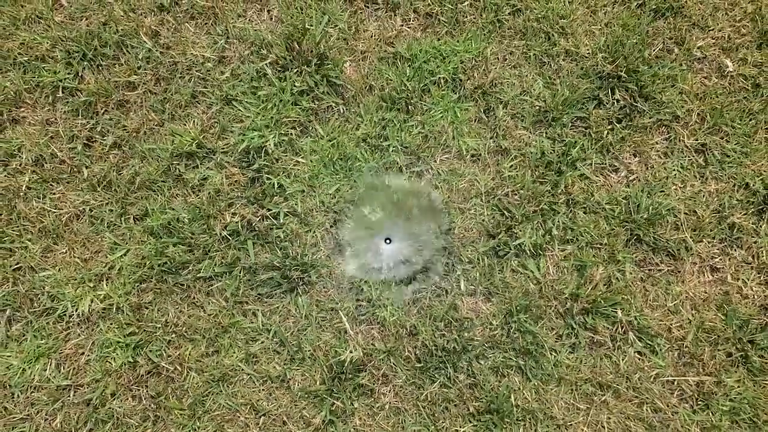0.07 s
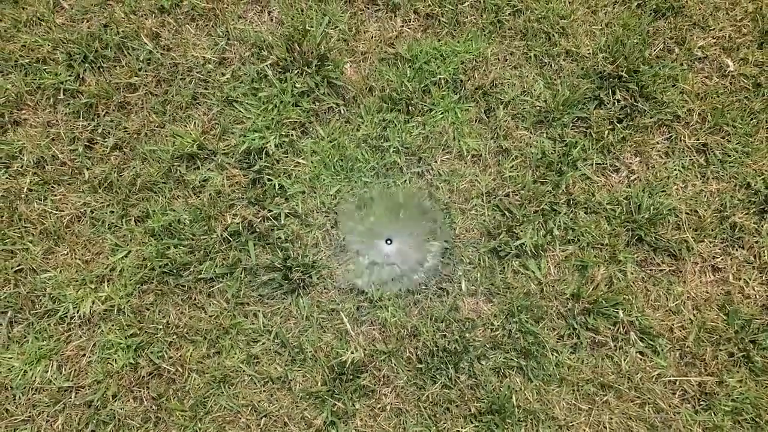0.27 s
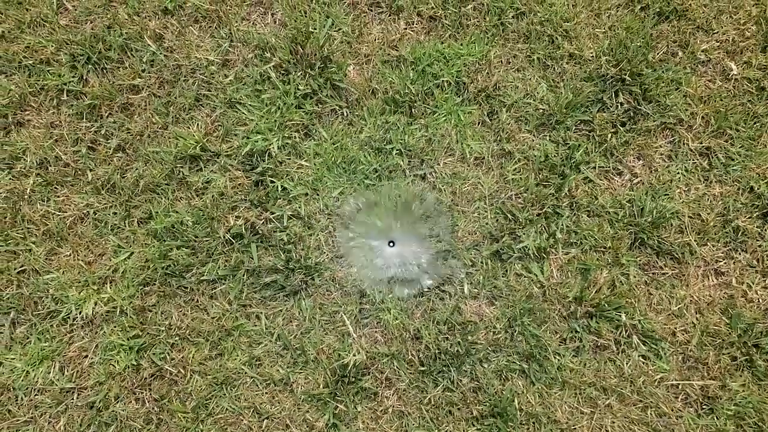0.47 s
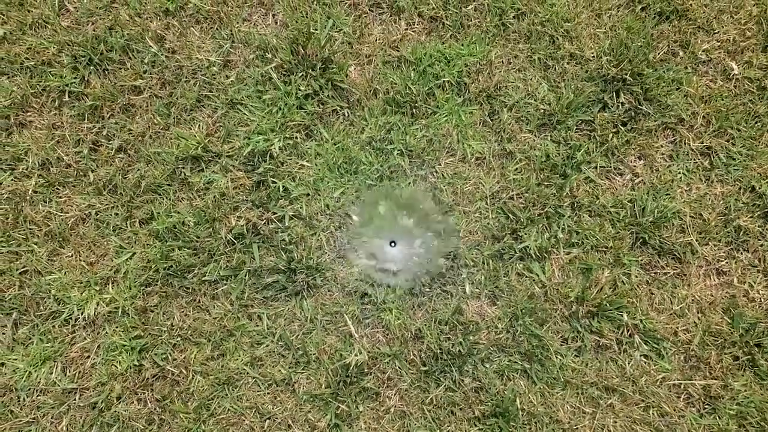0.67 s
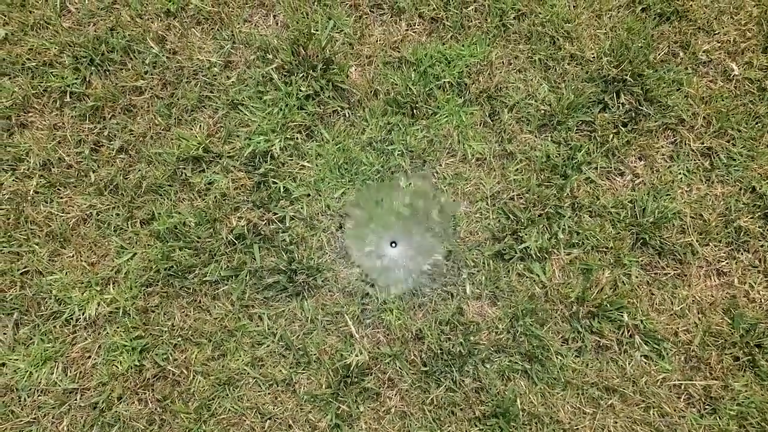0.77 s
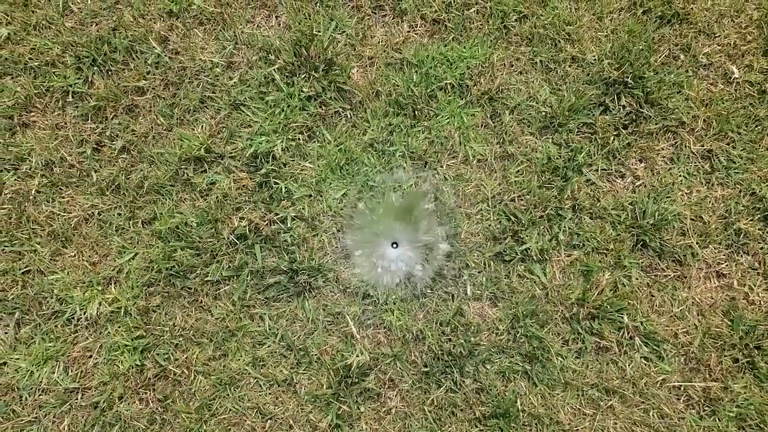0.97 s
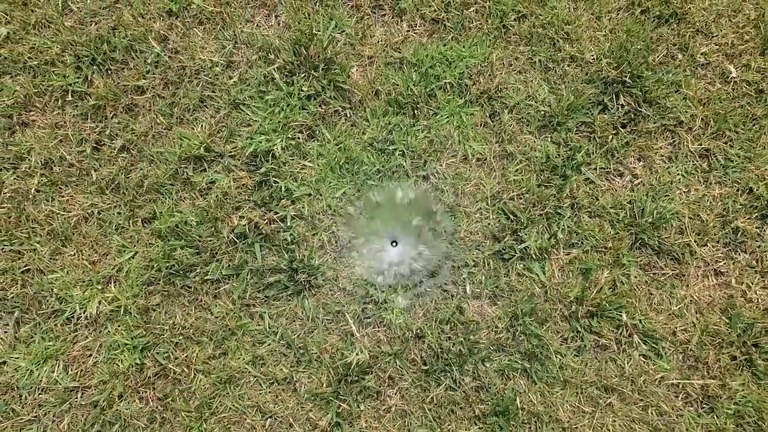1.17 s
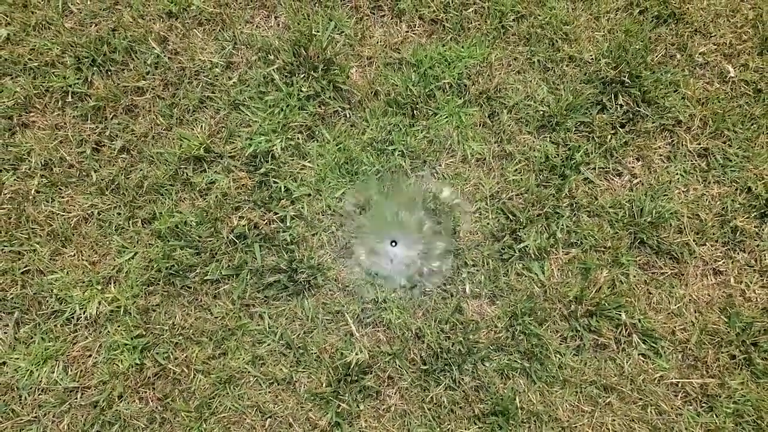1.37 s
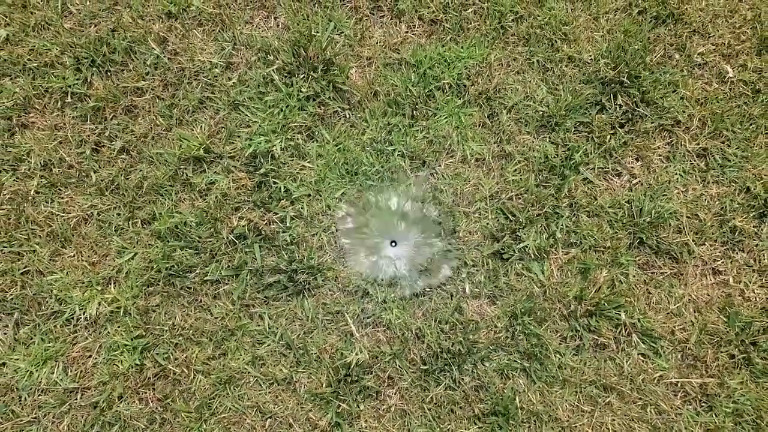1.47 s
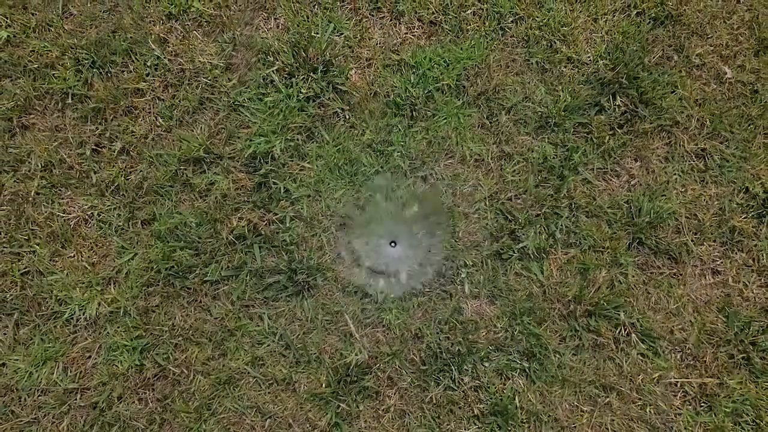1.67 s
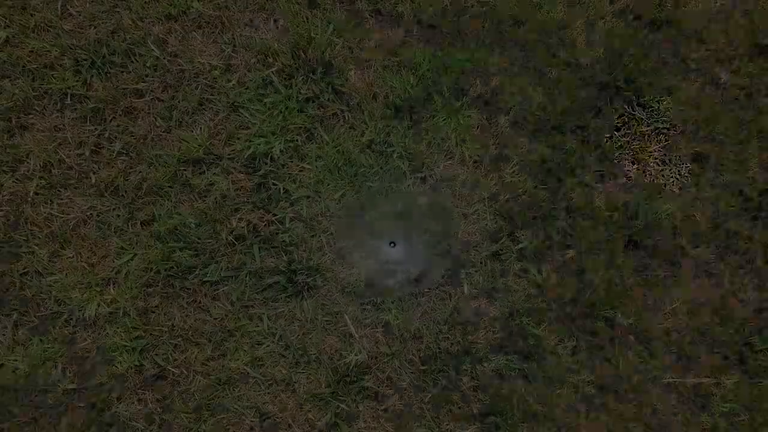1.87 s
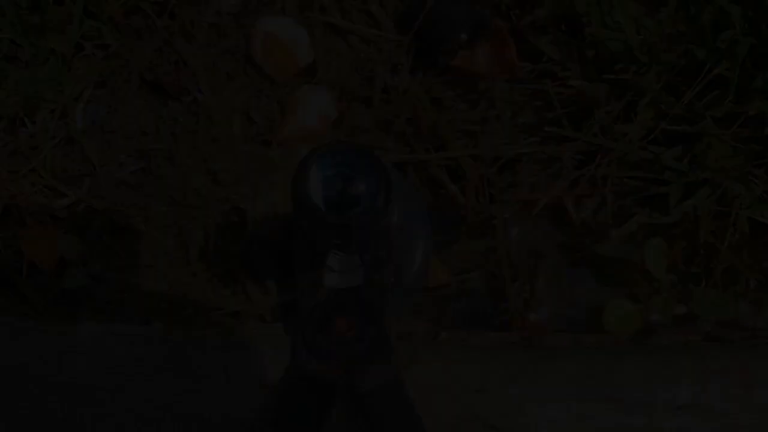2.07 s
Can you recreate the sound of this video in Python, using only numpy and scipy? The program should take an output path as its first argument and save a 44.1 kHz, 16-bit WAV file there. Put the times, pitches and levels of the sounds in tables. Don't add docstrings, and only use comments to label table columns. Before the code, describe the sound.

A small lawn sprinkler sprays from the first instant, a steady bright hiss with dense fine ticks over softer splashing on grass and soil. Sharper drops snap irregularly, mostly before 1.25 s, with a tiny plink near 0.83 s. Low wind puffs flutter beneath, strongest around 1.08 s, over a faint far motor hum. The level eases after 1 s, fades quickly from 1.3 s, and is silent by 2.05 s. Close, dry, outdoor stereo.

```python
import sys
import numpy as np
from scipy import signal
from scipy.fft import rfft, irfft, next_fast_len
from scipy.io import wavfile
from scipy.ndimage import map_coordinates

SR = 44100
rng = np.random.default_rng(int(sys.argv[2]) if len(sys.argv) > 2 else 0)


def natural_amplitude(level_db):
    exponent = np.asarray(level_db, float) / 20
    return 10 ** exponent


def materialize(psi):
    bounded = np.clip(np.atleast_2d(psi).T, -1, 1)
    quanta = np.round(bounded * 32767).astype(np.int16)
    wavfile.write(sys.argv[1], SR, quanta)


N = 93668

# time_s, gain_db
FADE_OUT = [(0, 1.5), (1.07, -2), (1.27, -6), (1.68, -21), (1.91, -33.5), (2.04, -48.5), (2.05, -50.5)]


def spray():
    # time_s, strength_db
    flow = [(0, -2), (.11, -2), (.21, -1), (.4, -1), (.47, -0.5), (.6, 0), (.63, -0.5), (.67, 1), (.71, -2),
            (.78, 1.5), (.92, 2), (1.03, 2), (1.09, 2.5), (1.27, 0), (1.29, -3.5), (1.37, 2.3), (1.44, 0),
            (2.1, 5.5)]
    mist_db, splash_db = -33, -39.5
    flow_db, = curves(flow)
    sputter_db = .4 * wobble(15.6) + 0.74 * wobble(59.17)
    mist_gain = natural_amplitude(mist_db + flow_db + sputter_db)
    splash_gain = natural_amplitude(splash_db + 0.84 * flow_db + 1.67 * sputter_db + 0.2 * wobble(8.02))
    return mist_gain * mist(mist_db) + splash_gain * splash() + plink()


def mist(mist_db):
    # frequency_hz, density_db_per_hz
    mist_spectrum = [(6600, -39.5), (7300, -14), (9400, -6.5), (11300, -8), (12500, 2), (14400, -3),
                     (15300, -9.5), (15900, -7)]
    # frequency_hz, likeness_0_to_1, right_lead_rad, left_over_right_db
    mist_between = [(7100, .5, -1.2, 0), (7700, .85, .2, .5), (8600, .78, .8, 1), (10600, .87, 3.1, -1),
                    (11400, .74, 4.5, -3), (12100, .88, 6.3, .8), (14900, .8, 9.4, -2),
                    (15700, .48, 12, -4)]
    stream = drops(hiss=.25) * natural_amplitude(1.3 * wobble(250)) + big_drops(mist_db)
    return ports(stream, .3, mist_spectrum, 15740, mist_between)


def big_drops(mist_db):
    # start_s, peak_db
    spits = [(0.0972, -14), (0.1307, -13.5), (0.194, -15.5), (0.2678, -37.5), (0.497, -23.5), (0.569, -16),
             (0.658, -14), (0.7342, -39.5), (0.7726, -19), (0.8106, -22.5), (0.861, -28), (0.8914, -11.5),
             (0.9038, -19.5), (1.1388, -31.5), (1.16, -31), (1.2501, -22.5)]
    rise_s, spit_db = .0012, 7
    fade_db, = curves(FADE_OUT)
    pulses = np.zeros(N)
    for start_s, peak_db in spits:
        level_db = peak_db + spit_db - mist_db - fade_db[round(start_s * SR)]
        pulses[round((start_s + rise_s) * SR)] = natural_amplitude(level_db)
    return pulses


def splash():
    # frequency_hz, density_db_per_hz
    splash_spectrum = [(250, -2.5), (700, -0.5), (1650, -6.5), (2150, -4), (2750, -6.5), (3350, -14),
                       (5900, -6.5), (7000, -12)]
    # frequency_hz, likeness_0_to_1, right_lead_rad, left_over_right_db
    splash_between = [(300, .93, -.1, 0), (1000, .87, -.2, 1), (1550, .58, -.4, 2.3), (2100, .75, .7, 2.3),
                      (3050, .55, 2.1, -.7), (3500, .78, .2, -2), (4900, .92, .15, 0),
                      (6200, .7, 1.8, -2.5)]
    return ports(drops(hiss=.68), .85, splash_spectrum, 7200, splash_between)


def plink():
    start_s, pitch_hz, level_db, width_s = .827, 5550, -21, .00024
    t = np.arange(N) / SR - start_s
    envelope = np.exp(-.5 * (t / width_s) ** 2)
    ring = natural_amplitude(level_db) * envelope * np.sin(2 * np.pi * pitch_hz * t)
    return ring * np.array([[1], [.3]])


def drops(hiss):
    drops_per_s, spread_db = 3500, 3.7
    chance, size = rng.random((2, N))
    hits = (chance < drops_per_s / SR) * natural_amplitude(-spread_db * np.log(size + .012))
    return np.sqrt(1 - hiss) * unit(bursts(hits)) + np.sqrt(hiss) * rng.standard_normal(N)


def bursts(hits):
    decay_s = .00022
    keep = np.exp(-1 / (decay_s * SR))
    envelope = signal.lfilter([np.sqrt(1 - keep ** 2)], [1, -keep], hits)
    return envelope * rng.standard_normal(N)


def ports(shared, hiss, spectrum, top_hz, between):
    bottom_hz = 184
    side = np.array([[.5], [-.5]])

    def colour(hz):
        return along(spectrum, hz)[0]

    def response(hz, own):
        alike, lead, tilt_db = along(between, hz)
        alike = np.clip(alike, 0, 1)
        share = np.sqrt(1 - alike if own else alike)
        band = (hz < top_hz) * hz ** 4 / (hz ** 4 + bottom_hz ** 4)
        return natural_amplitude(colour(hz) + side * tilt_db) * band * share * np.exp(-1j * side * lead)

    scale = np.std(filtered(rng.standard_normal(N), lambda hz: natural_amplitude(colour(hz)) * (hz < top_hz)))
    apart = np.array([drops(hiss), drops(hiss)])
    common = filtered(shared, lambda hz: response(hz, False))
    separate = filtered(apart, lambda hz: response(hz, True))
    return (common + separate) / scale


def wind():
    # frequency_hz, density_db_per_hz
    breeze_spectrum = [(15, -18), (40, -6), (75, -14.5), (110, -10.5), (160, -17), (250, -23.5),
                       (400, -65.5)]
    # centre_s, left_db, right_db, flutter_hz
    puff_rows = [(.02, -51, -32.5, 72), (.16, -26, -24.5, 74.4), (.238, -28, -27, 70),
                 (0.292, -26, -28, 76), (0.371, -24.5, -25, 76.6), (0.419, -45, -27.5, 74.4),
                 (0.484, -27, -29.5, 79), (0.552, -43.5, -32, 70), (0.594, -35, -33, 70),
                 (.63, -37, -35.5, 72), (0.679, -31.5, -31, 76.4), (0.771, -29, -32.5, 69),
                 (.84, -35.5, -56, 69.3), (0.912, -33.5, -36.5, 74.4), (1.004, -28.5, -29, 75.4),
                 (1.075, -18, -22.5, 79), (1.158, -33, -30, 63.4), (1.209, -45, -32.5, 66.4),
                 (1.261, -41, -31, 59.4), (1.362, -28, -28, 78), (1.388, -29, -28, 77),
                 (1.645, -32, -31, 70)]
    breeze_db, lumps_db, puff_s = -41.5, 4.5, 0.0089
    left_lumps = wobble(9.32) + 0.25 * wobble(28.82)
    right_lumps = wobble(9.6) + 0.41 * wobble(30)
    lumps = natural_amplitude(lumps_db * np.array([left_lumps, right_lumps]))
    rush = lumps * rng.standard_normal((2, N))
    breeze = unit(filtered(rush, lambda hz: natural_amplitude(along(breeze_spectrum, hz)[0])))
    puffs = np.zeros((2, N))
    phases = rng.normal(0, 0.81, (len(puff_rows), 2, 1))
    for (centre_s, left_db, right_db, flutter_hz), phase in zip(puff_rows, phases):
        t = np.arange(N) / SR - centre_s
        envelope = natural_amplitude([[left_db], [right_db]]) * np.exp(-.5 * (t / puff_s) ** 2)
        puffs -= envelope * np.cos(2 * np.pi * flutter_hz * t + phase)
    return natural_amplitude(breeze_db) * breeze + puffs


def motor():
    # multiple, level_db
    harmonics = [(1, -2.5), (2, -10), (3, -21), (5, -16)]
    # time_s, level_db
    motor_run = [(0, -58), (.15, -37.5), (.4, -42.5), (.6, -46.5), (1.1, -44), (1.5, -43), (2.1, -41.5)]
    run_db, = curves(motor_run)
    phase = 2 * np.pi * np.cumsum(79.5 + 1.285 * wobble(12)) / SR
    hum = np.zeros(N)
    for k, level_db in harmonics:
        hum += natural_amplitude(level_db + 1.77 * wobble(7.7)) * np.sin(k * phase + k * k)
    flicker_db = 2.5 * np.array([wobble(15), wobble(8.2)])
    return natural_amplitude(run_db + 3.5 + flicker_db) * hum


def ducking():
    # centre_s, left_db, right_db, half_length_s
    ducks = [(0.072, -11, 0.5, 0.014), (0.193, -14, -7, 0.014), (.55, 0.5, 2.5, 0.048),
             (0.715, 1.5, -16, 0.031), (0.957, 2.5, -18, 0.022), (1.042, -10, -10.5, 0.018),
             (1.118, -16, -4, 0.033), (1.306, -26, -11.5, 0.032)]
    t = np.arange(N) / SR
    gain_db = np.zeros((2, N))
    for centre_s, left_db, right_db, half_s in ducks:
        gain_db += np.array([[left_db], [right_db]]) * np.exp(-((t - centre_s) / half_s) ** 4)
    return natural_amplitude(gain_db)


def unit(x):
    return x / np.sqrt(np.mean(x ** 2) + 1e-20)


def along(points, hz):
    f, *cols = np.transpose(points)
    return [np.interp(np.log(hz + 1), np.log(f + 1), c) for c in cols]


def curves(rows):
    s, *cols = np.transpose(rows)
    return [np.interp(np.arange(N) / SR, s, c) for c in cols]


def wobble(rate):
    return map_coordinates(rng.standard_normal(2000), [np.arange(N) * rate / SR])


def filtered(x, response):
    m = next_fast_len(N + 8192)
    return irfft(rfft(x, m) * response(np.fft.rfftfreq(m, 1 / SR)), m)[..., :N]


def scene():
    return spray() + ducking() * (wind() + motor())


def low_pass(x):
    return signal.sosfilt(signal.butter(12, 16990, fs=SR, output="sos"), x)


def record(dry):
    end_s = 2.05
    fade_db, = curves(FADE_OUT)
    mix = dry * natural_amplitude(fade_db) * (np.arange(N) < end_s * SR)
    return low_pass(mix)


dry = scene()
out = record(dry)
materialize(out)
```